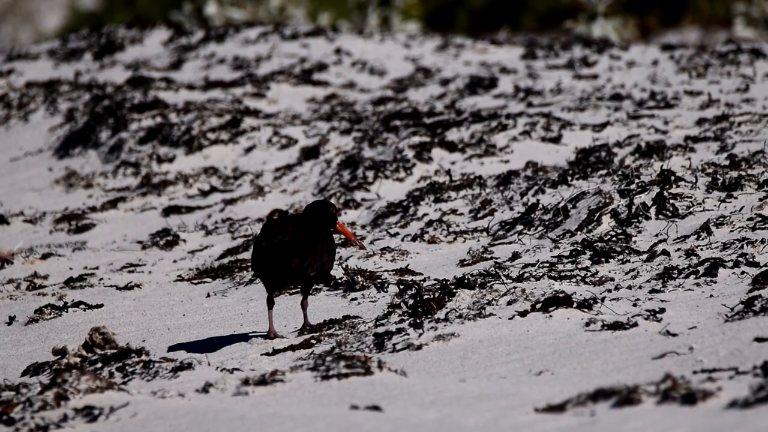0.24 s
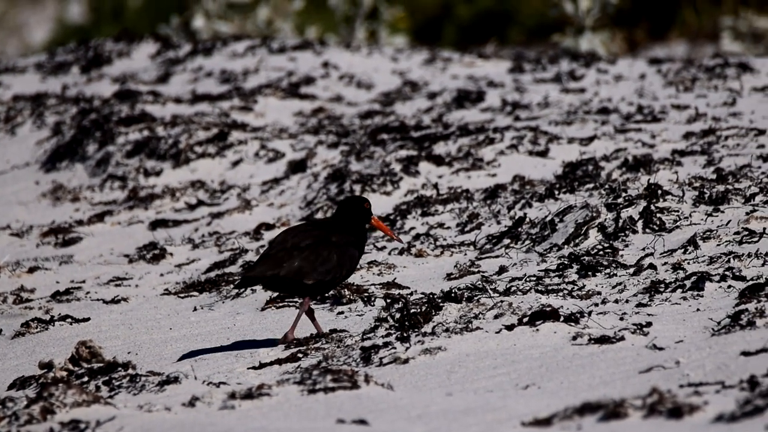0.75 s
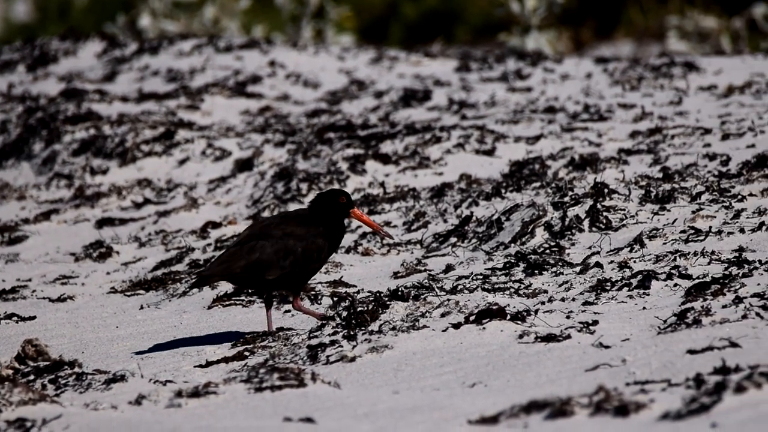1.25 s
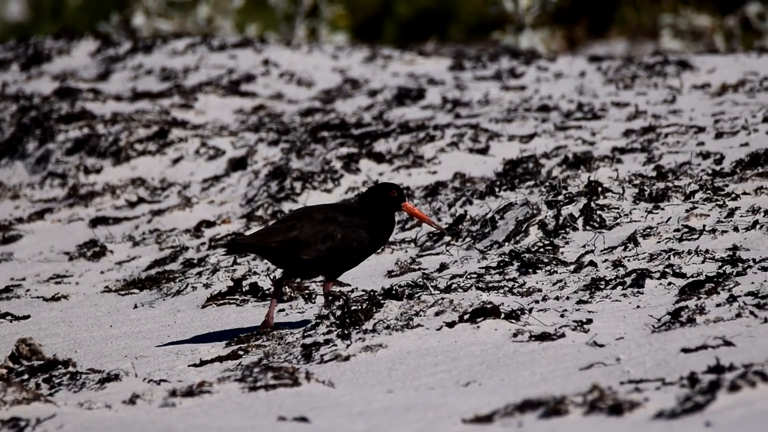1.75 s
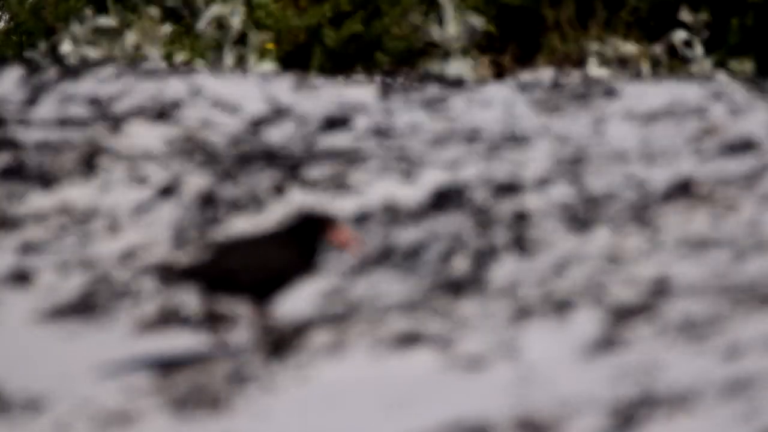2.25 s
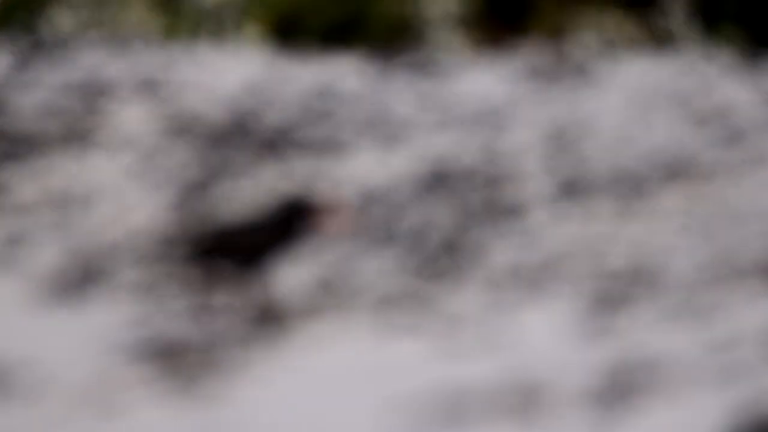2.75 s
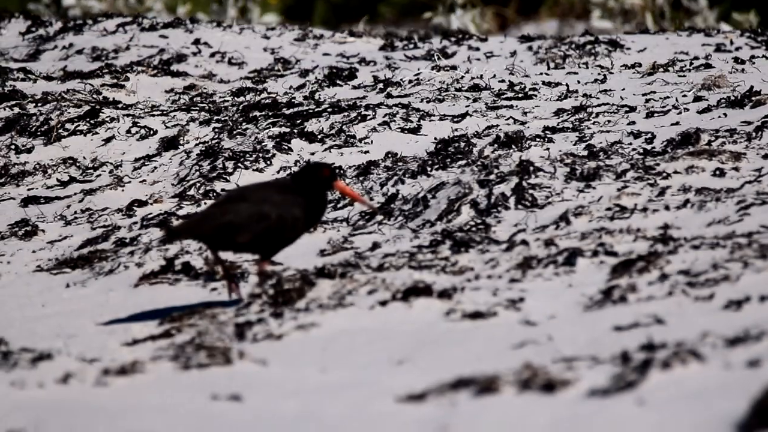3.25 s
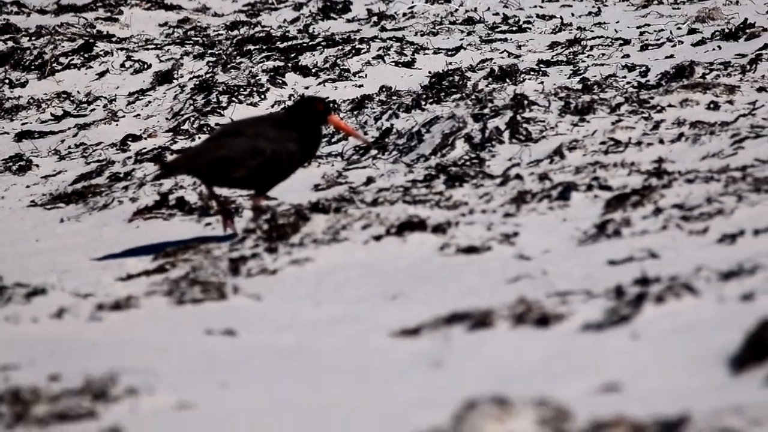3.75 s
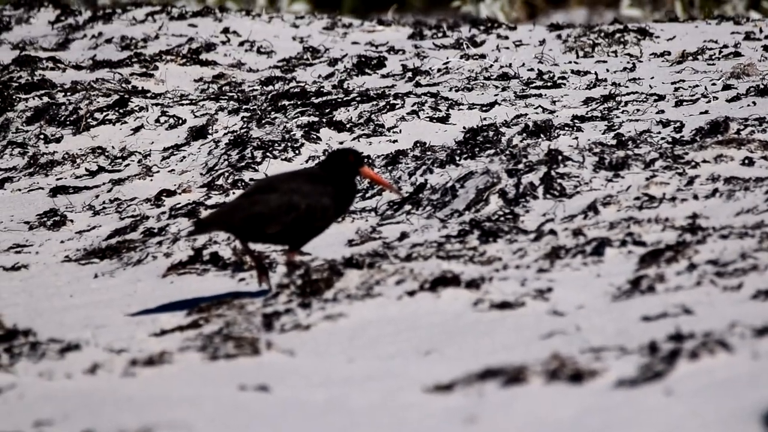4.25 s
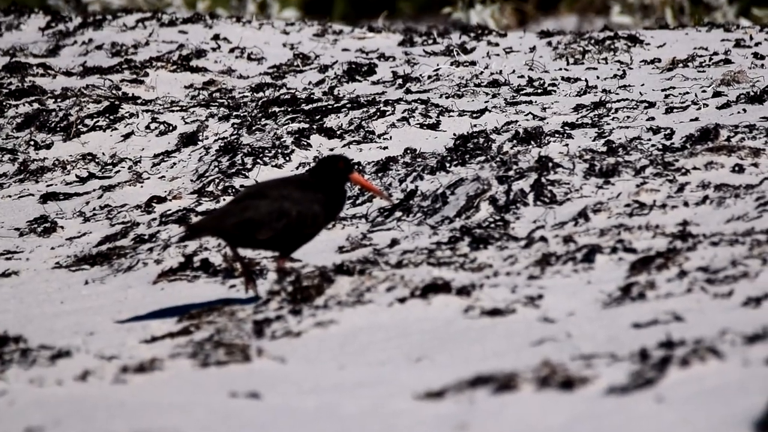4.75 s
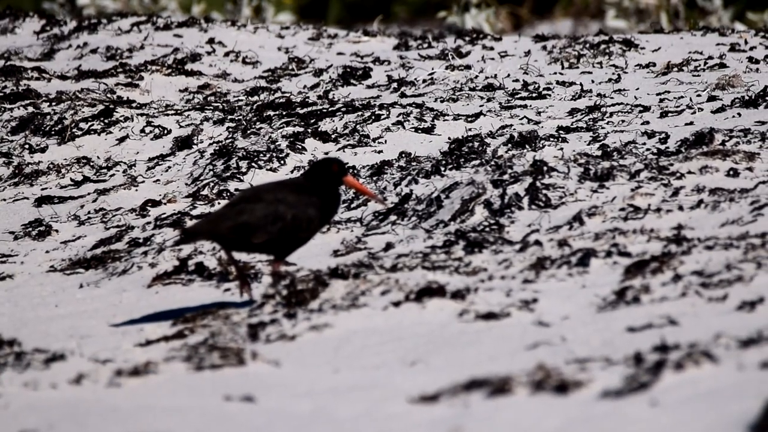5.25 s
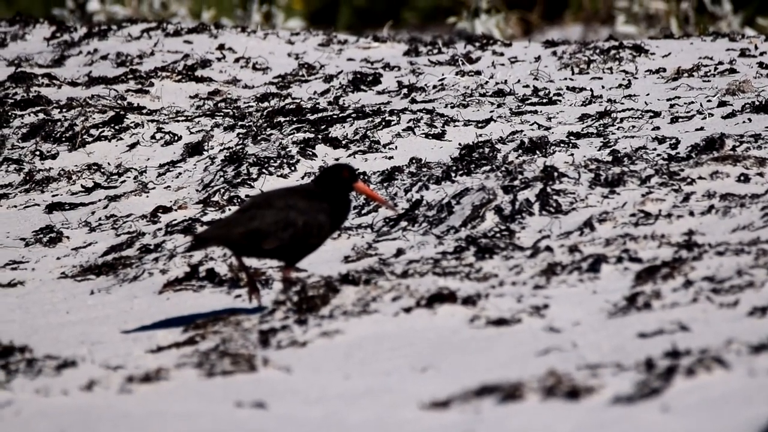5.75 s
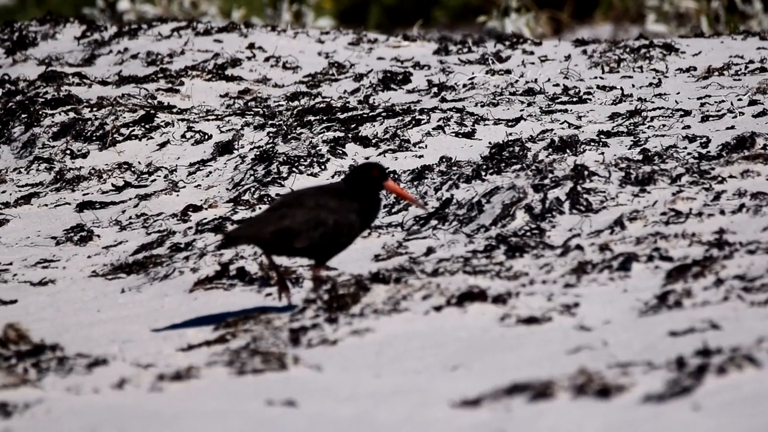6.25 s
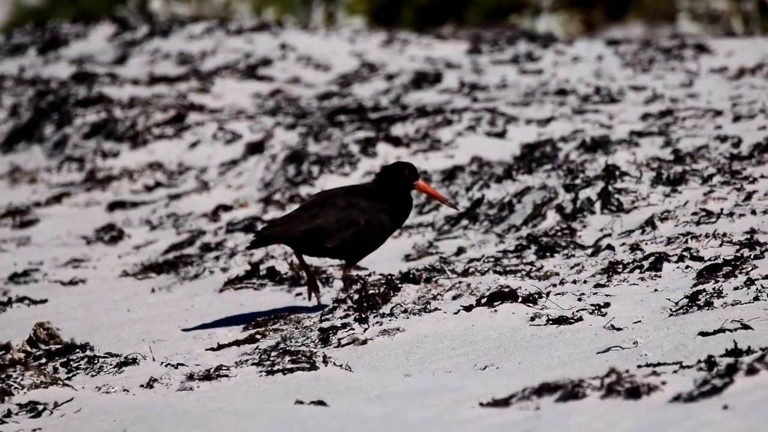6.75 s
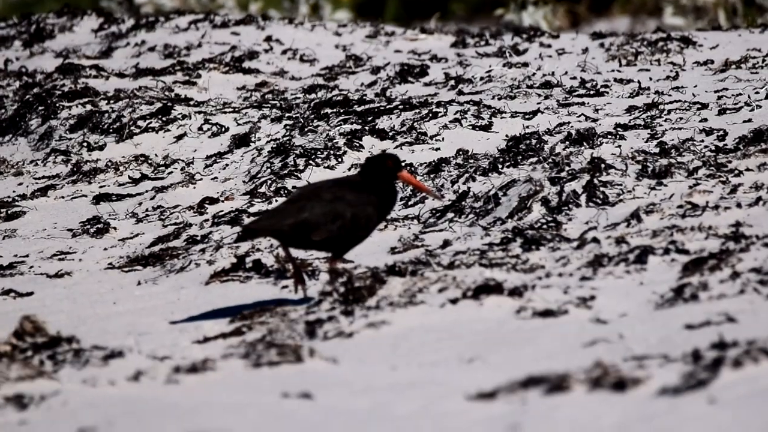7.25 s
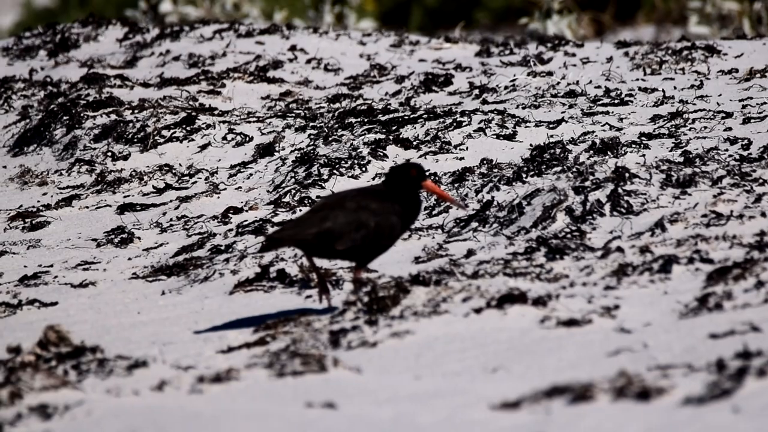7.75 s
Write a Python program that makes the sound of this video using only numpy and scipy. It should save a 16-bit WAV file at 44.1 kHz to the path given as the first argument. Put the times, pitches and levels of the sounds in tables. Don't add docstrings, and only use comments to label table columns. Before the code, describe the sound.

Soft surf washes and fizzes in the distance, thinly picked up by a small microphone, dry and open. In front, a bird utters single sharp peeps about a quarter second long, yodelling up and down in pitch. Around the second peep the background abruptly gets louder, then drops, with a small click at each edge. A minute high metallic ting comes later, then more peeps, one very weak, the last fading.

```python
import sys
import numpy as np
from scipy import signal
from scipy.fft import rfft, irfft
from scipy.io import wavfile
from scipy.ndimage import uniform_filter1d

SR = 44100
rng = np.random.default_rng(int(sys.argv[2]) if len(sys.argv) > 2 else 0)


def natural_amplitude(level_db):
    exponent = np.asarray(level_db, float) / 20
    return 10 ** exponent


def persist_wave(psi):
    counts = np.round(np.clip(psi, -1, 1) * 32767).astype(np.int16)
    wavfile.write(sys.argv[1], SR, np.atleast_2d(counts).T)


N = 352800


def walk(rate):
    hold = int(SR / rate)
    held = rng.standard_normal(N // 100)[np.arange(N) // hold]
    return 1.43 * uniform_filter1d(uniform_filter1d(held, hold), hold)


# (time [s], half-width [ms], change of level [dB])
FADES = [(.103, 6, -2.5), (.196, 3, 3), (.2145, 1.8, -7), (.278, 10, -4.5), (3.528, 1.2, -7),
         (2.012, 9.5, -2.5), (2.038, 3.3, -5), (2.063, 9, -8.5), (2.111, 1.63, -5), (2.123, 0.9, -0.5),
         (2.143, 6.4, -4), (2.165, 3, -5), (2.188, 2.7, 2), (3.416, 6.2, -2.5), (3.549, 3.9, -4),
         (3.596, 3, -9), (6.837, 4.9, -15.5), (6.855, 2.25, -15.5), (6.866, 4.2, -5), (6.892, 1.7, -7),
         (7.163, 2.9, -12), (7.179, 1.5, -9), (7.236, 1.55, -2), (7.245, 1.3, -13.5), (7.254, 2.5, -6.5),
         (7.286, 1.17, -4)]


def bird(splash_db=-24, breath_db=-28, breath_hz=800):
    t = np.arange(N) / SR
    low, low_sizes = register(high=0)
    high, high_sizes = register(high=1)
    power = abs(low) ** 2 + abs(high) ** 2 + 1e-12
    contest = 2 * abs(low * high)
    sidebands = 0.6 * (high ** 2 * low.conj() + low ** 2 * high.conj()) / power

    turn = (low + high) / np.sqrt(abs(low + high) ** 2 + 0.03 * power)
    spray_db = splash_db - 8.4 * np.arange(len(low_sizes))
    splash = uniform_filter1d(contest / np.sqrt(power), 300) * natural_amplitude(spray_db)[:, None]
    steady = 1 - 0.8 * uniform_filter1d(contest / power, size=200)
    sizes = np.hypot(low_sizes, high_sizes) * steady + splash
    overtones = sum(size * turn ** (k + 2) for k, size in enumerate(sizes))

    fade = natural_amplitude(sum(db * np.exp(-0.5 * ((t - s) * 1000 / ms) ** 2) for s, ms, db in FADES))
    joint = (low + high + sidebands) * fade
    joint = joint / (1 + (abs(joint) / 0.5) ** 6) ** (1 / 6)

    breath_filter = signal.butter(4, breath_hz, fs=SR, output="sos")
    air = signal.sosfilt(breath_filter, rng.standard_normal((2, N)))
    rough = 1 + natural_amplitude(breath_db + np.array([[0], [2]])) * air / air.std()
    voice = (joint * rough[0] + overtones * rough[1]).imag
    voice = voice + natural_amplitude(-51) * abs(joint) * rng.standard_normal(N)
    return signal.sosfilt(signal.butter(3, 900, "high", fs=SR, output="sos"), voice)


def register(high, step_db=-6, bright=0.68, beak_hz=12400):
    waver_db, waver_share, waver_per_s = 4.5, 0.011, 110
    hz, *partials, beak_db, waver = controls(high)
    slew = int(0.0022 * SR)
    wobble = 0.00208 * walk(150) + waver_share * waver * walk(waver_per_s)
    pitch = uniform_filter1d(hz, 2 * slew) * (1 + wobble)
    db = [uniform_filter1d(p, slew) for p in partials]

    drive = bright * (db[3] - db[0] + 33.0)
    for k in (1, 2, 3):
        beak_loss = beak_db / (1 + (beak_hz / (pitch * (4 + k))) ** 20)
        db.append(db[3] + k * (step_db + drive) + beak_loss)
    db[1:] = [d + waver_db * waver * walk(waver_per_s) for d in db[1:]]

    shimmer_db = np.linspace(1.1, 3.5, len(db))
    sizes = []
    for k, d in enumerate(db):
        audible = pitch * (k + 1) < 16500
        sizes.append(np.sqrt(2) * natural_amplitude(d + shimmer_db[k] * walk(120)) * audible)
    return sizes[0] * np.exp(2j * np.pi * np.cumsum(pitch) / SR), np.array(sizes[1:])


# (time [s], pitch [Hz], level of the fundamental [dB])
LONG_NOTES = [
    [[(.084, 2150, -25), (.132, 2270, -11), (.15, 2353, -11.5)], [(.152, 2690, -13.5), (.186, 2660, -14),
     (.206, 2556, -13)], [(.212, 2270, -10.5), (.262, 2212, -14.5), (.317, 2125, -26)]],
    [[(1.954, 2170, -25), (1.985, 2364, -15.5)], [(1.987, 2610, -13.5), (2.03, 2665, -15),
     (2.084, 2590, -10.5), (2.122, 2364, -17)], [(2.124, 2290, -15.5), (2.18, 2180, -20),
     (2.21, 2083, -25)]],
    [[(3.358, 2160, -22.5), (3.393, 2360, -12)], [(3.397, 2650, -14), (3.438, 2657, -12.5),
     (3.486, 2608, -17.5), (3.523, 2490, -5)], [(3.527, 2320, -10.5), (3.566, 2243, -14),
     (3.606, 2165, -23.5)]],
]
# (time [s], pitch [Hz], level of the fundamental [dB])
SHORT_NOTES = [
    [[(4.947, 2105, -36), (4.985, 2190, -31.5), (5.003, 2230, -34.5), (5.022, 2192, -31.5),
     (5.04, 2060, -37)]],
    [[(6.755, 2260, -28.5), (6.765, 2395, -23.5)], [(6.768, 2623, -22), (6.826, 2545, -14),
     (6.853, 2545, -22.5), (6.885, 2570, -12.5), (6.911, 2503, -12)], [(6.916, 2325, -11.5),
     (6.948, 2086, -23)]],
    [[(7.144, 2250, -22), (7.153, 2350, -27)], [(7.156, 2625, -17), (7.185, 2675, -25), (7.228, 2610, -26),
     (7.265, 2440, -19)], [(7.269, 2204, -19.5), (7.3, 2253, -21.5), (7.325, 1996, -34)]],
]
# (overtone gain low [dB], overtone gain high [dB], tilt [dB per partial],
# loss of the beak turned away [dB], waver [0-1])
COLOURS = [
    (0.5, -5, -0.5, -10, 0.35),
    (6, 11, 1, -14, 0.06),
    (1, 2.5, -0.3, -22, 0.15),
    (-24, 0, -8, -12, 0.2),
    (1, 4, -4, -4, 0.89),
    (-12.5, -7, -1.5, -15, .7),
]
# (low register dies [dB/ms], low register returns [dB/ms], high register dies [dB/ms])
BREAKS = [
    (0.9, 0.58, 2.46),
    (4, 3.9, 4.4),
    (1, 4.9, 4.2),
    (3, 3, 3),
    (2.1, 4.06, .9),
    (2, 3.4, 2.7),
]
# (level in low register [dB], level in high register [dB], share of level followed [1],
# dip at the break [dB], loss of slack membranes [dB per 100 Hz])
PARTIALS = [
    (-30, -34, 0.63, -16.5, -0.05),
    (-41.5, -46.5, 0.21, -8, 4),
    (-47, -52.5, 0.63, -0.5, 5.5),
]
# (offset [Hz], time constant [ms])
SETTLE = [(-120, 13.98), (-69.5, 8.25), (89, 6.1)]


def controls(high):
    onset_db_ms, end_db_ms, jump_db_ms = 2, 1.2, 6.5
    break_hz, break_width_hz = 2470, 97
    curl_hz, curl_ms = -190, 16
    slack_hz = 2150
    ms = np.arange(N) / SR * 1000
    silence = np.array([break_hz, -150, -150, -150, -150, 0, 0])
    out = np.zeros((7, N)) + silence[:, None]
    for parts, colour, (dies, returns, drops) in zip(LONG_NOTES + SHORT_NOTES, COLOURS, BREAKS):
        low_db, high_db, tilt_db, beak_db, waver = colour
        near = slice(int(SR * (parts[0][0][0] - 0.05)), int(SR * (parts[-1][-1][0] + 0.05)))
        now = ms[near]
        for k, part in list(enumerate(parts))[high::2]:
            s, hz, db = np.transpose(part)
            since, until = now - s[0] * 1000, s[-1] * 1000 - now
            first, last = k == 0, k == len(parts) - 1

            swell_db_ms = (onset_db_ms, jump_db_ms, returns)[k]
            decay_db_ms = end_db_ms if last else (dies, drops)[k]
            lapse = np.maximum(-since, 0) * swell_db_ms + np.maximum(-until, 0) * decay_db_ms
            lapse = lapse * (1 + lapse / 42)
            level = np.interp(now, s * 1000, db)

            pitch = uniform_filter1d(np.interp(now, s * 1000, hz), size=400)
            settle_hz, settle_ms = SETTLE[k]
            pitch = pitch + settle_hz * np.minimum(np.exp(-since / settle_ms), 1 + first)
            pitch = pitch + last * curl_hz * np.minimum(np.exp(-until / curl_ms), 2)

            dip = np.exp(-0.5 * ((pitch - break_hz) / break_width_hz) ** 2)
            dip = dip * (1.5 - high_db / 22)
            slack = np.maximum(slack_hz - pitch, 0) / 100
            grip = np.where((since < 0) & first | (until < 0) & last, 1, 1.3)
            over = []
            for n, (*register_db, follow, dip_db, slack_db) in enumerate(PARTIALS):
                base = register_db[high] + (low_db, high_db)[high] + n * tilt_db
                over.append(base + follow * (level + 15.5) + dip_db * dip - slack_db * slack - grip * lapse)
            rows = [pitch, level - lapse, *over, beak_db + 0 * dip, waver + 0 * dip]
            out[:, near] = np.where(level - lapse > out[1, near], rows, out[:, near])
    return out


# (frequency [Hz], level [dB], decay by 60 dB [s])
PING = [(9400, -35.5, 0.037), (12050, -40, 0.025)]


def ping():
    t = np.maximum(np.arange(N) / SR - 3.0625, 0)
    attack = 1 - np.exp(-t / 0.003)
    out = 0
    for hz, db, t60 in PING:
        out = out + natural_amplitude(db) * np.sin(2 * np.pi * hz * t) * np.exp(-np.log(1000) * t / t60) * attack
    return out


STEP_S, CLICK_DB = (1.9394, 2.2214), (-20, -35)


def background_step():
    t = np.arange(N) / SR
    return natural_amplitude(5 * ((t > STEP_S[0]) & (t < STEP_S[1])))


def step_clicks():
    t = np.arange(N) / SR
    jumps = 0
    for s, db in zip(STEP_S, CLICK_DB):
        jumps = jumps + natural_amplitude(db) * (t >= s) * np.exp(-np.maximum(t - s, 0) / 0.00006)
    return signal.lfilter(*signal.butter(2, 1200, "high", fs=SR), jumps)


# (time [s], wash level [dB], lift of the foam's fizz over it [dB])
SURF = [(0.0, -38.5, -2), (0.2, -37.5, -5), (0.71, -45, -1.5), (1.51, -43, -4.5), (1.85, -42, -3.5),
        (2.05, -47.5, 6.5), (2.47, -46, 7), (2.85, -47, 2), (3.12, -47.5, 6.5), (3.45, -42.5, 1.5),
        (4.17, -47.5, 2), (4.6, -46.5, -1.5), (5.01, -48.5, 4), (6.26, -47.5, -0.5), (6.82, -43, -1.5),
        (7.2, -44.5, -2.5), (7.75, -43, -3.5), (8.0, -42, -2.5)]
# (lower edge [Hz], upper edge [Hz])
SURF_BANDS_HZ = [
    (250, 900),
    (1000, 1700),
    (2800, 3900),
    (5600, 7400),
]
# (frequency [Hz], density [dB per Hz])
SURF_COLOUR = [(15, -64), (25, -28), (82, -37), (222, -31.5), (283, -21), (332, -15.5), (370, -16.5),
               (726, -16), (1240, -4.5), (1770, 0), (2250, -1), (3110, -1.5), (4420, -13), (9400, -33.5),
               (15700, -43)]
# (level at -45 dB wash [dB], share of wash [1], share of lift [1])
RUMBLE, HISS = (-59, 0.52, -0.34), (-65, 0.58, -0.15)


def surf(trim_db=1.12, bass_db=4.0, hiss_db=0.0):
    t, f = np.arange(N) / SR, np.fft.rfftfreq(N, 1 / SR) + 1e-3
    s, wash, lift = np.transpose(SURF)
    rumble, hiss = (db + a * (wash + 45) + b * lift for db, a, b in (RUMBLE, HISS))
    levels = rumble, wash, wash + lift, hiss

    hz, db = np.transpose(SURF_COLOUR)
    foam = rfft(rng.standard_normal(N)) * natural_amplitude(np.interp(np.log(f), np.log(hz), db))
    gains = []
    for level, (a, b) in zip(levels, SURF_BANDS_HZ):
        raw_db = 10 * np.log10(2 * np.sum(abs(foam[(f > a) & (f < b)]) ** 2) / N ** 2)
        gains.append(np.interp(t, s, level) - raw_db)
    drift = gains[0] - np.median(gains[0][N // 2:])
    steady = np.median(gains[1][N // 2:]) + 0.3 * drift
    gains = np.array([steady + bass_db, *gains, steady + hiss_db])
    centres = np.r_[7.3, np.log2(SURF_BANDS_HZ).mean(axis=1), 13.5]

    out, swell = 0, walk(1.5) + 2.8 * walk(11)
    for octave in np.arange(4, 14.5, 0.5):
        window = np.cos(np.pi * np.clip(np.log2(f) - octave, -0.5, 0.5))
        band = np.roll(irfft(foam * window, N), rng.integers(N))
        share = np.array([np.interp(octave, centres, row) for row in np.eye(len(gains))])
        restless_db = 0.2 * swell + 1.0 * walk(13)
        out = out + band * natural_amplitude(share @ gains + trim_db + restless_db)
    return out


def scene():
    return (bird() + ping() + surf() * background_step() + step_clicks())[None]


def top_cut(x):
    return signal.sosfilt(signal.butter(12, 15830, fs=SR, output="sos"), x)


def record(dry):
    thump = signal.sosfilt(signal.butter(1, [12, 70], "band", fs=SR, output="sos"), dry ** 2)
    wet = dry + natural_amplitude(-29.0) * thump + natural_amplitude(-72) * rng.standard_normal(dry.shape)
    wet = signal.sosfilt(signal.ellip(8, 0.2, 60, 15750, fs=SR, output="sos"), wet)
    return top_cut(wet)


dry = scene()
out = record(dry)
persist_wave(out)
```